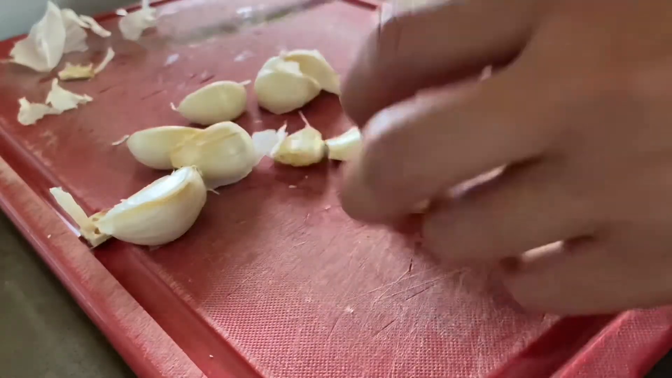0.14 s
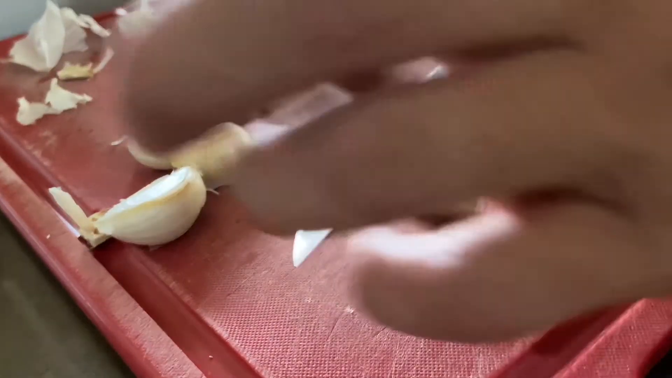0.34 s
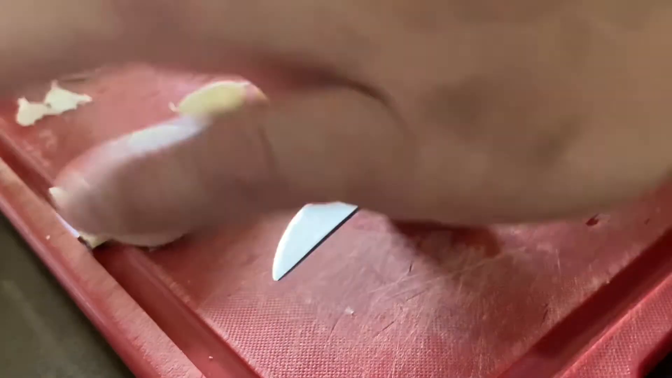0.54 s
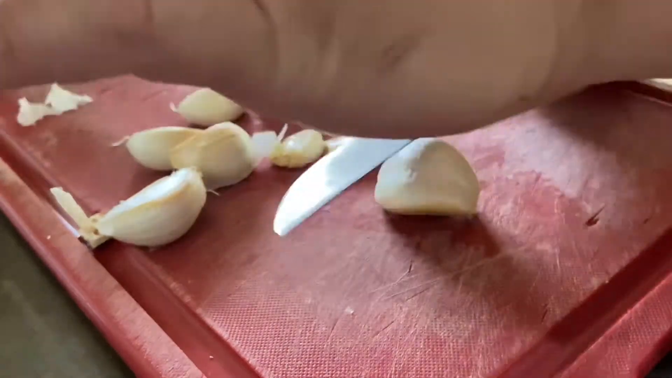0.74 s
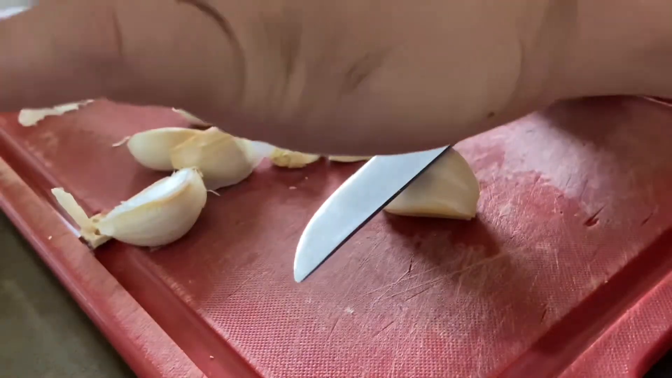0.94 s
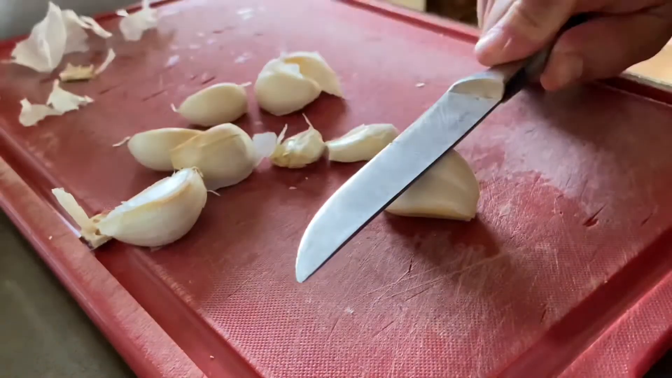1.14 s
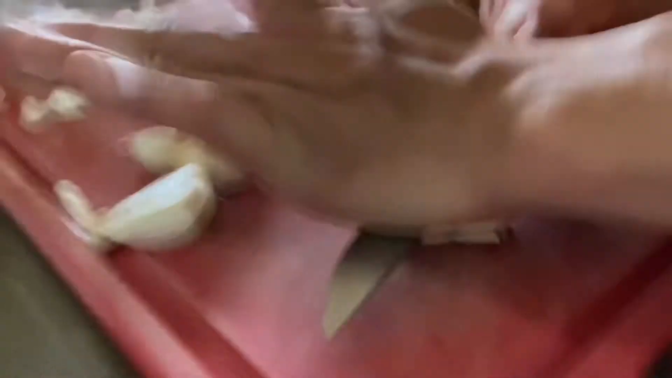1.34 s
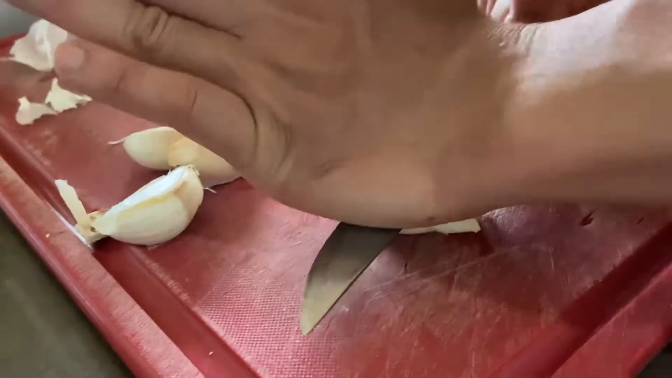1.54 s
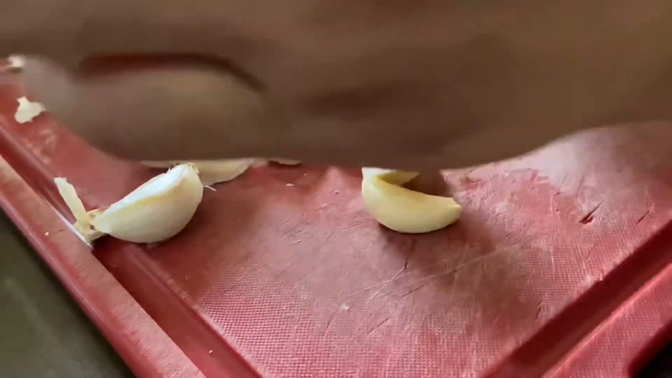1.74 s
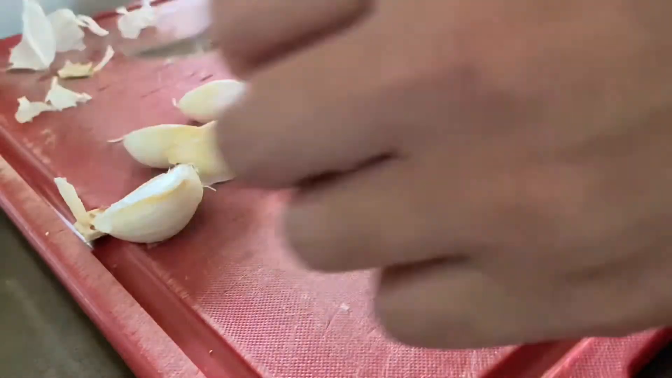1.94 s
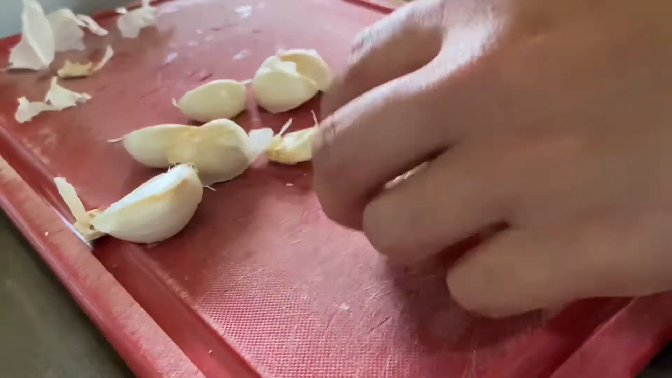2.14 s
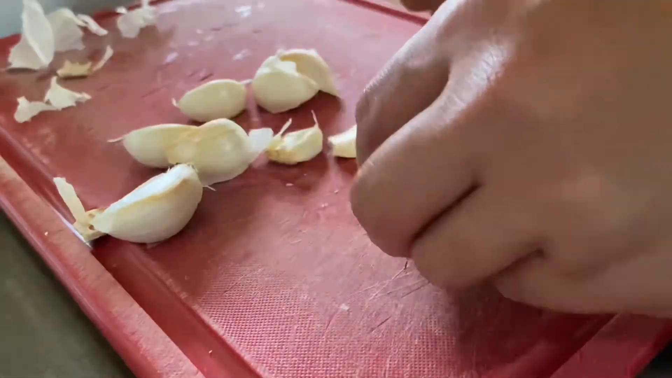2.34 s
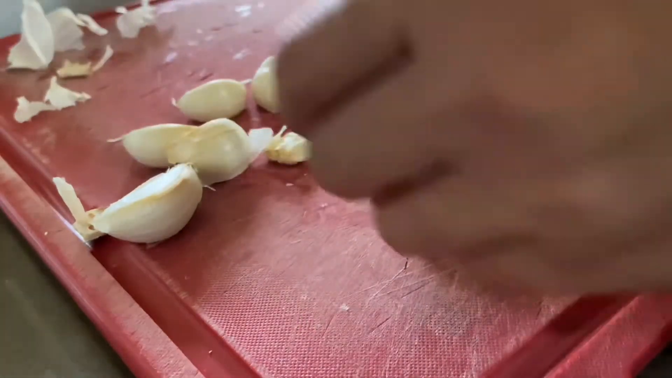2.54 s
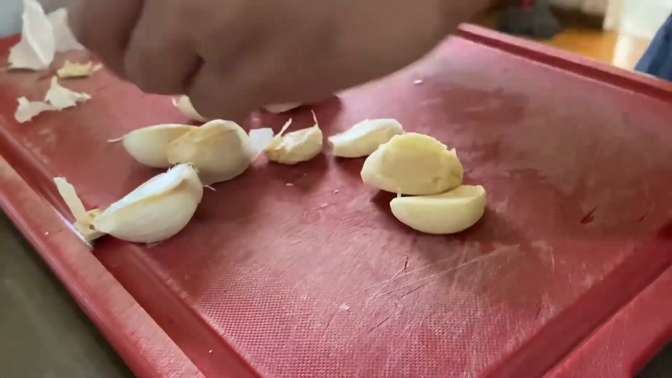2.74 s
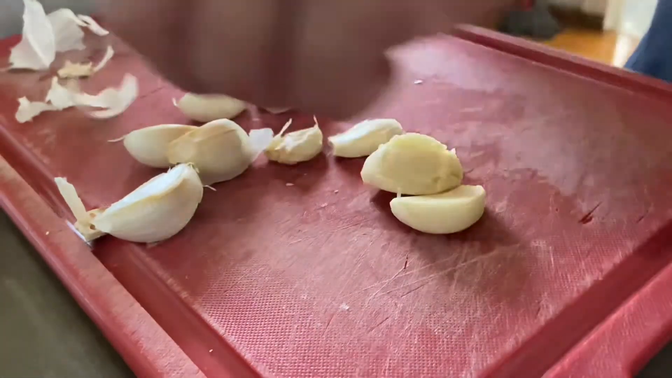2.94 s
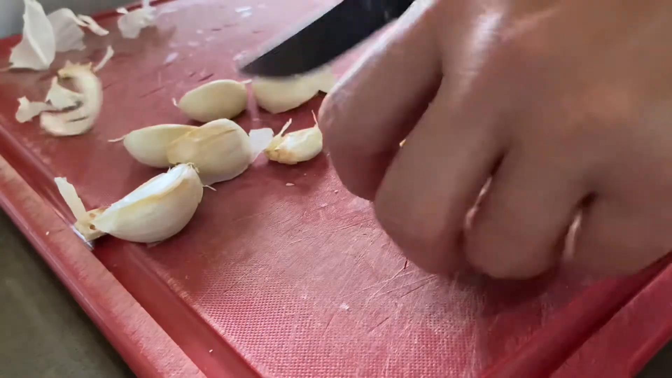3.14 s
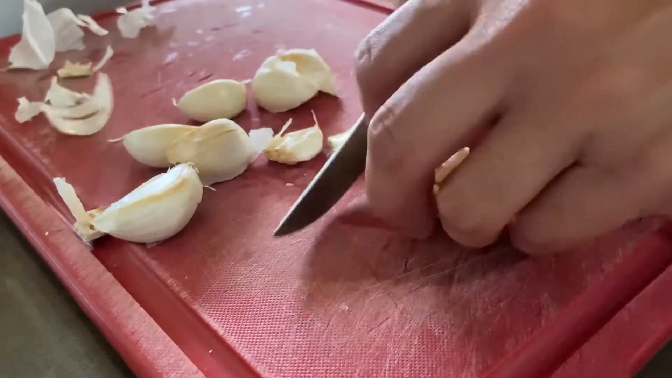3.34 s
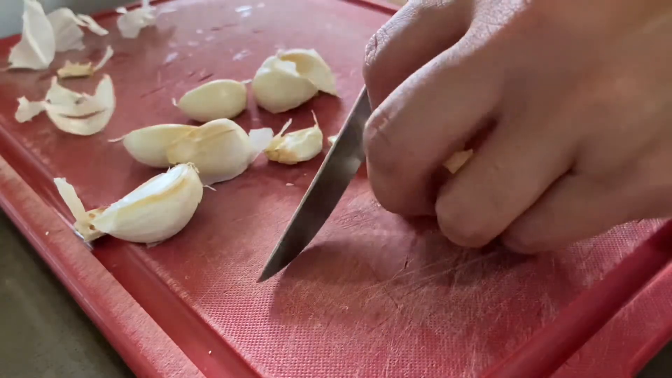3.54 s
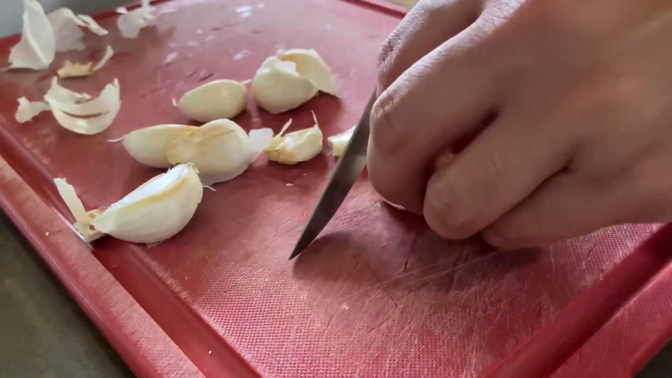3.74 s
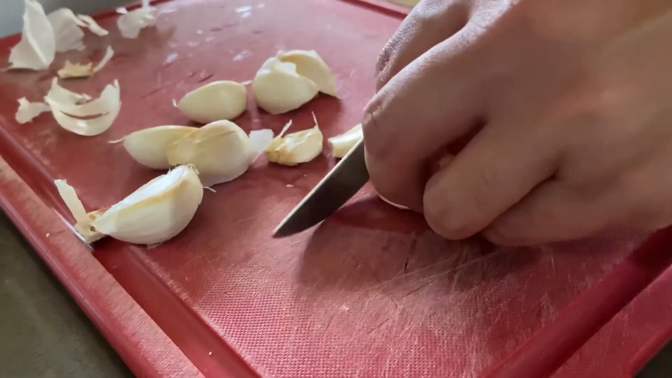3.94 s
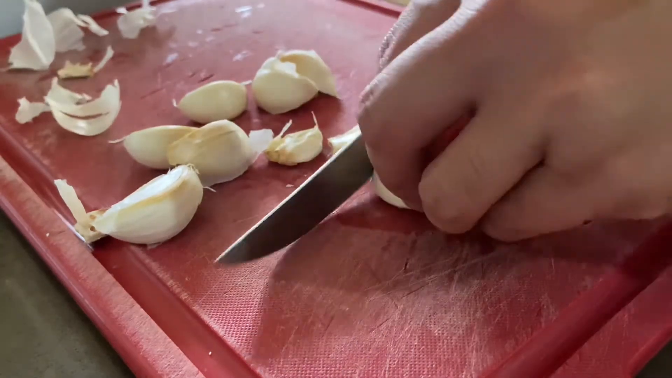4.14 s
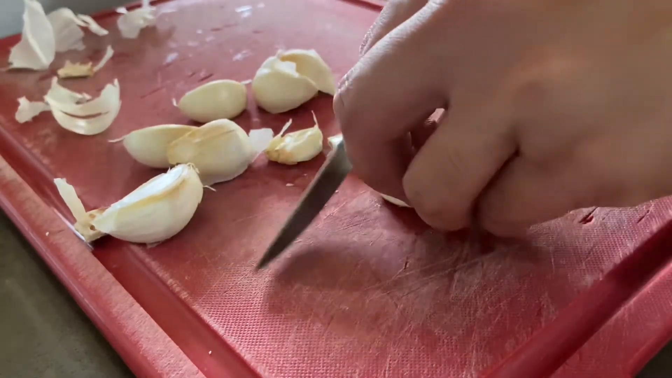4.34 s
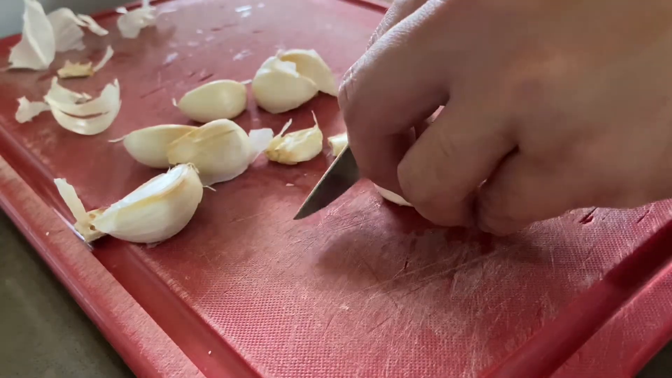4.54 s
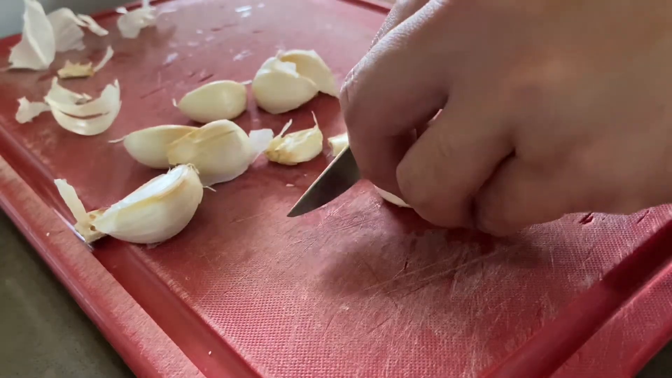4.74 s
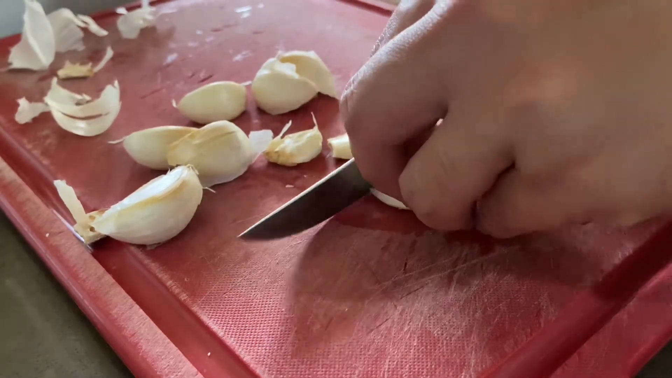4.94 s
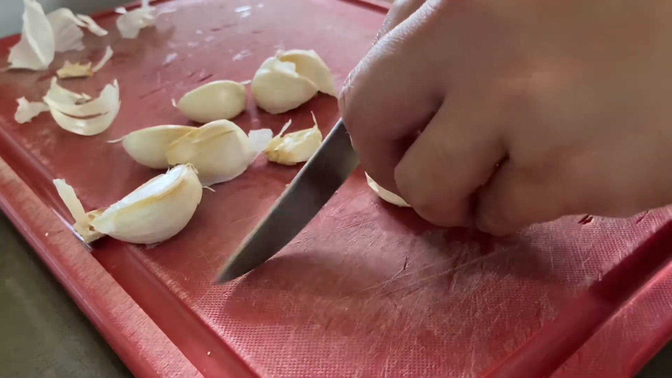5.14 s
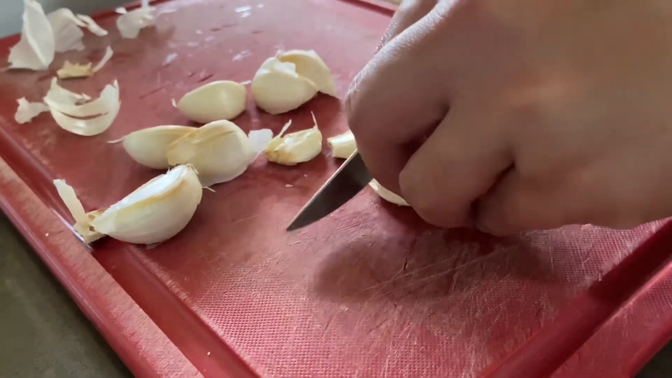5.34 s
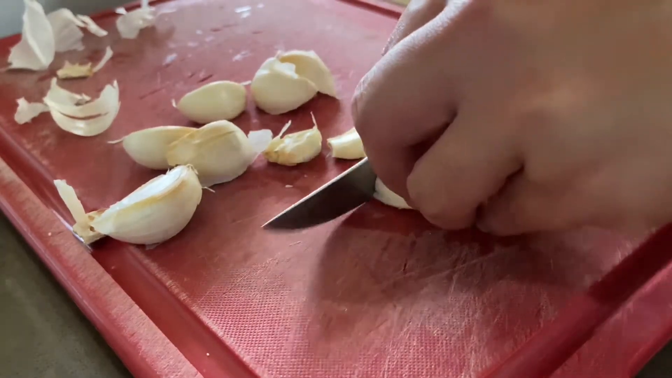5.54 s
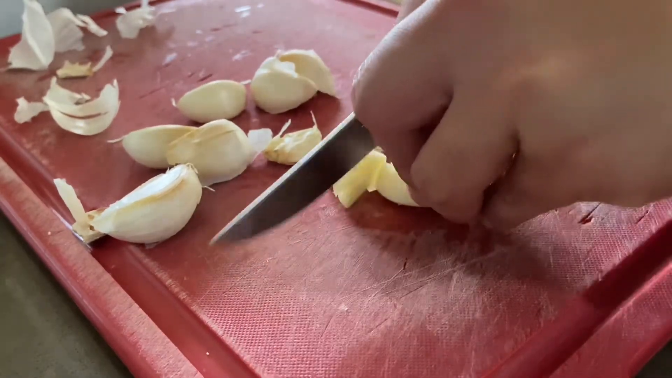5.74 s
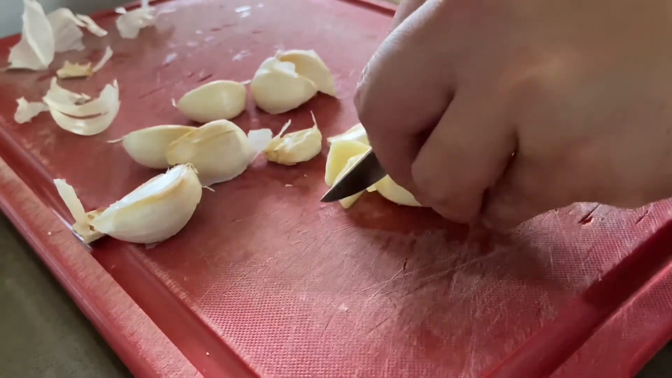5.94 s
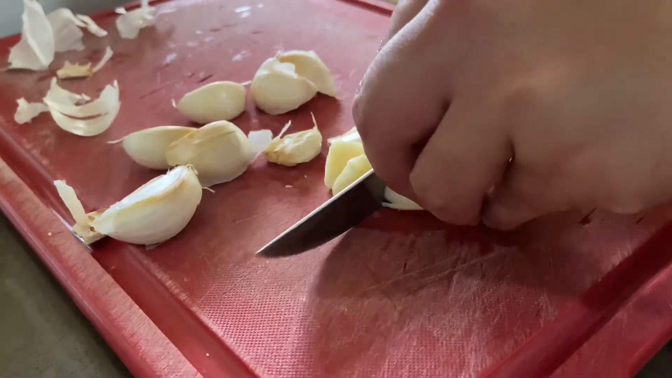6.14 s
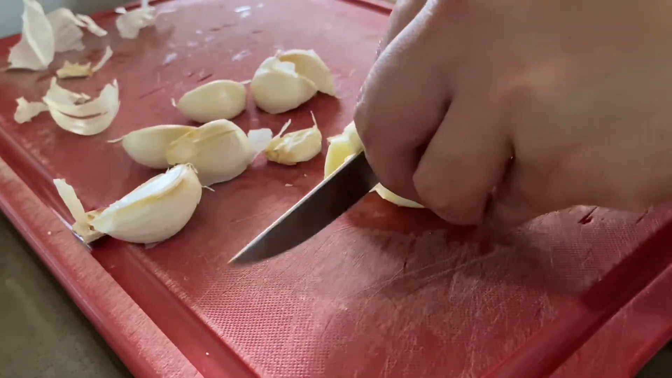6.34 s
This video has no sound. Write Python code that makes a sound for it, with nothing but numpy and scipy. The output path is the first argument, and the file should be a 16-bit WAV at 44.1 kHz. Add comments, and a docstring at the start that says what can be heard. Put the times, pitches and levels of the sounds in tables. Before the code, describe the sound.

A clove of garlic is tapped onto a plastic cutting board, then crushed by one violent smack, by far the biggest sound. Quiet picking and papery ticks fill the pause. A hard knock with a thin steel ring starts the chopping: uneven, separate cuts, crunchy snaps, short scraping drags and hollow board knocks. Close microphones, a lightly reverberant kitchen, and a low steady hum that slowly swells.

```python
"""A garlic clove is smacked flat and chopped on a plastic board in a kitchen, close to a pair of microphones.
From the start, shaped noise and wavering sines give room air and a faint hum; uneven noise gives the rustle.
Near 0.4 s come a light snap (noise tick), knock (board modes) and thud (counter modes). At 1.3 s the flat
blade slaps (noise bursts) and rings (steel modes), then slides squeak (resonant noise). Chops follow from
2.8 s to 6.3 s. Two-port delays place the close sounds, and decaying reflections make the room ring."""
import sys
import numpy as np
from scipy import signal
from scipy.fft import rfft, irfft, next_fast_len
from scipy.io import wavfile
from scipy.ndimage import uniform_filter1d

SR = 44100
rng = np.random.default_rng(int(sys.argv[2]) if len(sys.argv) > 2 else 0)


def output_pcm(signal):
    """Save a mono or channel-first signal as 16-bit PCM at the path in sys.argv[1].

    Samples are clipped to [-1, 1] before scaling.
    """
    pcm = np.clip(np.atleast_2d(signal).T, -1, 1) * 32767
    wavfile.write(sys.argv[1], SR, np.round(pcm).astype(np.int16))


N = 285327  # samples


def amp(db):
    """Level law: 20 dB is a factor of ten in amplitude."""
    return 10 ** (np.asarray(db) / 20)


def evened(x):
    """Normalisation to a root-mean-square of one."""
    return x / np.sqrt(np.mean(x ** 2) + 1e-20)


def read(points, hz):
    """Interpolation of a spectrum along logarithmic frequency."""
    f, value = np.transpose(points)
    return np.interp(np.log(hz + 1), np.log(f + 1), value)


def add(mix, s, sound):
    """Superposition: a sound is summed into the mix from time s."""
    part = mix[round(s * SR):][:len(sound)]
    part += sound[:len(part)]


def coloured(x, db):
    """Linear filtering: each FFT bin of x is scaled by its own dB value."""
    return irfft(rfft(x) * amp(db), len(x))


def ring(modes, lift_db, damping, rise_ms, spread):
    """Modal synthesis: a struck body sounds as dying sines, scattered because each blow lands elsewhere.

    The spread holds the scatter of level (dB), phase (radians) and pitch (share)."""
    hz, db, t60 = np.transpose(modes)[:, :, None]
    length_s = min(t60.max() / damping, 1 / 3)
    t = np.arange(int(SR * length_s)) / SR
    luck = rng.standard_normal((3, len(modes), 1)) * np.reshape(spread, (3, 1, 1))
    decay_db = 60 * damping * t / np.maximum(t60, .003)
    level = amp(db + lift_db + luck[0] - decay_db)
    sines = np.sin(2 * np.pi * hz * (1 + luck[2]) * t + luck[1])
    onset = 1 - np.exp(-t * 1000 / rise_ms)
    return (level * sines).sum(0) * onset


# slow swell of the whole background: t/s, level/dB
SWELL = [(0, -62), (.9, -63), (1.6, -59), (3.2, -56.5), (4.5, -52.5), (5.5, -48), (6.47, -50)]
# relative spectrum of the room air: f/Hz, level per Hz/dB
AIR = [(15, -43.5), (25, -7), (118, -1), (192, -5), (280, -16), (358, -14.5), (445, -18.5), (1060, -24.5),
       (2270, -39), (2900, -39), (5720, -40.5), (7510, -40), (8830, -57), (11000, -38), (16500, -68)]
# likeness of the air at left and right: f/Hz, coherence/1
AIR_SAME = [(60, 0.95), (130, 0.89), (260, 0.58), (1000, 0.3), (6000, 0.22), (9000, 0.23)]
# lines of an appliance, relative to the first line: f/Hz, level/dB
HUM = [(360.7, -75.5), (522.2, -85), (1066, -91.5), (1836, -101), (2923, -102)]
HUM_DB = -3  # first line against the air, before it wavers


def background():
    """Partly coherent noise: lumpy rumble and hiss, plus the wavering lines of an appliance."""
    s, swell_db = np.transpose(SWELL)
    t = np.arange(N) / SR
    frames, hz = N // 512 + 5, np.fft.rfftfreq(2048, 1 / SR)
    a, b, c, d, patches = rng.standard_normal((frames, 1025, 5)).T
    # smoothing over frequency, then time, makes the lumps
    patches = uniform_filter1d(patches, size=6, axis=0)
    patches = evened(uniform_filter1d(patches, size=8, axis=1))
    same = np.clip(read(AIR_SAME, hz), -1, 1)[:, None]
    left, other = a + 1j * b, c + 1j * d
    z = np.array([left, same * left + np.sqrt(1 - same ** 2) * other])
    z *= amp(read(AIR, hz)[:, None] + 0.5 * patches)
    air = evened(signal.istft(z, nperseg=2048, noverlap=1536)[1][:, :N])
    hum = np.zeros((2, N))
    for f, db in HUM:
        waver = uniform_filter1d(rng.standard_normal(N), size=3000)
        waver = evened(uniform_filter1d(waver, size=3000))
        phase = 2 * np.pi * f * t + 0.19 * waver + [[0], [1.8]]  # radians, left and right
        hum += amp(db - HUM[0][1] + 3.0 * waver) * np.sin(phase)
    return (air + hum * amp(HUM_DB)) * amp(np.interp(t, s, swell_db))


# relative spectrum of snapping skin and flesh: f/Hz, level/dB
SNAP = [(1500, -29), (2500, -8), (4000, -3), (5500, -10), (7000, -2.5), (9000, -5.5), (11000, 1),
        (13000, -0.5), (16000, -22)]


def skin_db(size, lower):
    """Complementary band division: the colour of a snap in its lower or upper treble, parted at 4800 Hz."""
    hz = np.fft.rfftfreq(size, 1 / SR)
    share = 1 / (1 + (hz / 4800) ** 8)
    return read(SNAP, hz) + 10 * np.log10((share if lower else 1 - share) + 1e-9)


# fingers rustle skin, the blade drags through flesh:
# start t/s, length t/s, skin hiss level/dB, drag on the board level/dB
RUSTLE = [(0.032, 0.047, -70.5, -81), (1.5, 0.18, -69, -71), (1.798, 0.03, -72, -80),
          (2.227, 0.038, -61, -72), (2.299, .12, -81, -81), (2.553, 0.081, -75.5, -90),
          (2.718, 0.044, -77.5, -84.5), (3.19, 0.21, -74, -81), (3.849, 0.089, -69.5, -57),
          (3.952, 0.078, -57, -56), (4.056, 0.094, -64.5, -67), (4.799, 0.027, -55, -50.5),
          (4.871, 0.1, -53.5, -67), (5.123, 0.084, -66.5, -72), (5.242, 0.019, -67, -62),
          (5.404, 0.034, -53.5, -50), (5.423, 0.0057, -41, -35.5), (5.478, 0.063, -66, -61),
          (5.574, 0.043, -52.5, -44.5), (6.021, 0.061, -46, -47), (6.113, 0.12, -55, -80)]
# relative spectrum of the drag: f/Hz, level/dB
DRAG = [(400, -19), (900, 0.5), (1600, 2), (2100, -9), (3500, -5), (5000, -4.5), (6800, -26), (9000, -42.5)]
RISE_DB_PER_S, HISS_FALL_DB_PER_S, DRAG_FALL_DB_PER_S = 702, 400.5, 200
CRACKS_PER_S, CRACK_DB, CRACK_SPREAD_DB = 35, 6.5, 5  # stray cracks that ride on the rustle


def rustle():
    """Friction as dense random slips: uneven noise and stray cracks in two bands that rise, hold and fade."""
    t, level, size = np.arange(N) / SR, np.zeros((2, N)), next_fast_len(N)
    fall_db_per_s = np.array([[HISS_FALL_DB_PER_S], [DRAG_FALL_DB_PER_S]])
    for s, length, upper_db, lower_db in RUSTLE:
        near = abs(t - s) < .5
        before = np.maximum(s - t[near], 0)
        after = np.maximum(t[near] - s - length, 0)
        stroke_db = [[upper_db], [lower_db]] - RISE_DB_PER_S * before - after * fall_db_per_s
        level[:, near] += amp(stroke_db)
    unevenness = evened(uniform_filter1d(rng.standard_normal(size), size=60))
    slips = rng.standard_normal(size) * amp(3.2 * unevenness)
    crack_size = amp(CRACK_SPREAD_DB * np.minimum(rng.exponential(1, size), 3))
    cracks = (rng.random(size) < CRACKS_PER_S / SR) * crack_size
    slips = evened(slips) * (1 + amp(CRACK_DB) * np.convolve(cracks, np.hanning(40), "same"))
    upper = evened(coloured(slips, skin_db(size, False)))
    lower = evened(coloured(slips, read(DRAG, np.fft.rfftfreq(size, 1 / SR))))
    return upper[:N] * level[0] + lower[:N] * level[1]


# skin and flesh snap: t/s, peak level of the upper treble/dB, lower treble against it/dB
SNAPS = [(0.377, -48.5, -12), (1.3216, -17.5, -15), (1.3241, -5, -14), (1.3274, -8.5, 0),
         (1.3834, -37, -8.5), (1.5514, -47.5, -13), (1.5793, -31, -34), (1.6172, -30, -23),
         (1.637, -41.5, -22), (1.657, -45, -22), (2.1856, -45.5, -33), (2.2233, -36.5, -21.5),
         (2.2972, -48, -9), (2.358, -51, -24), (2.5693, -49, -28), (2.7256, -55, -6), (2.8433, -41, 4),
         (3.3325, -37, 27.5), (3.8387, -49, -8), (3.8482, -38.5, 0.5), (3.898, -33.5, -9),
         (3.9426, -36, 3.5), (3.9509, -4, -29.5), (4.0039, -37.5, 7.5), (4.023, -30, -20),
         (4.0296, -14, -10.5), (4.1578, -25, -22.5), (4.164, -46, -24.5), (4.4028, -52.5, 18.5),
         (4.788, -20.5, -16.5), (4.797, -17, -23), (4.806, -22, -23), (4.8087, -8, -26.5),
         (4.8189, -7, -21.5), (4.851, -4.5, -38), (4.8644, -15, -30), (4.8754, -19, -31),
         (4.947, -35.5, -20), (4.9887, -18.5, -36), (4.9996, -33, -24), (5.255, -34.5, -9),
         (5.295, -38.5, -19.5), (5.3812, -42, -7), (5.3908, -35, -11), (5.4096, -25.5, -12.5),
         (5.4305, -6, -3), (5.4378, -20, -6), (5.4448, -11.5, -3.5), (5.5521, -20.5, -19),
         (5.635, -42.5, -12.5), (6.0006, -40.5, -14), (6.015, -38, -6), (6.0305, -29, 3),
         (6.077, -6.5, -36), (6.0797, -4, -17), (6.2697, -38, -27)]


def snaps():
    """Impulsive fracture noise: a tick that swells within a millisecond, then a weaker dying puff of cracks."""
    out, t = np.zeros(N), np.arange(2048) / SR
    tick = np.exp(-((t - .0009) / 0.00028) ** 2)
    tail = amp(-4.5 - 20 * t / 0.0026) * np.clip(t / 0.00054, 0, 1)
    lead = 128  # samples of room for the filter to spread before the tick
    for s, db, lower_db in SNAPS:
        puff = np.roll(rng.standard_normal(len(t)) * (tick + tail), lead)
        upper = coloured(puff, skin_db(len(t), False))
        lower = coloured(puff, skin_db(len(t), True))
        both = upper / abs(upper).max() + amp(lower_db) * lower / abs(lower).max()
        add(out, s - lead / SR, amp(db) * both)
    return out


# the blade or a clove meets the board:
# t/s, blow level/dB, hardness level/dB, damping factor/1, rebound level/dB
KNOCKS = [(0.379, -44, -28, 1.5, -13), (2.842, -56.5, 15.5, 3.3, -25.5), (3.331, -27.5, 10, 0.84, -7.5),
          (3.85, -35.5, -7.5, 1.07, -10), (3.906, -47, 4.5, 1.1, -17), (4.003, -52, 26, 1, -27),
          (4.405, -26.5, 3.5, 1.28, -27), (4.789, -43, 10.5, 1, -17), (4.821, -21, 8, 1.27, -18),
          (5.257, -31.5, -7, 1.4, -21.5), (5.392, -43, -5, 1.5, -13.5), (5.41, -42.5, 0, 1.7, -15.5),
          (5.43, -19, 11, 1.09, -18.5), (6, -44.5, -18, 2, -22), (6.033, -42.5, -11, .6, -11.5),
          (6.082, -20.5, 8, .95, -19)]
# modes of the plastic board: f/Hz, relative level/dB, t60/s before the damping factor divides it
BOARD = [(584, -9.5, 0.031), (639, -10.5, 0.037), (838, -10, 0.042), (835, -8, 0.11), (881, -0.5, 0.09),
         (1007, -10.5, 0.078), (1170, -2.5, 0.043), (1335, 5.5, 0.035), (1482, -2, 0.043),
         (1609, 6.5, 0.022), (1853, -22.5, 0.06), (2440, -4, 0.011), (2780, 2, 0.009), (3131, -2, 0.021),
         (3420, -12.5, 0.022), (3680, 0, 0.016), (4180, -5.5, 0.004), (4750, -27, 0.011), (6240, -12, .01),
         (6900, -23, 0.0058)]
MIDDLE_HZ, UPPER_HZ = 950, 2200  # lower bounds of the middle and upper modes
MIDDLE_SHARE, MIDDLE_DB = 0.51, -2  # hardness lifts the upper modes fully, the middle ones in part
BOUNCE_S, BOUNCE_SOFTER_DB = 0.034, -7  # every knock rebounds once


def knocks():
    """Modal excitation by impact: a harder blow feeds the board's higher modes, and a softer rebound follows."""
    out, hz = np.zeros(N), np.transpose(BOARD)[0][:, None]
    for s, db, hard_db, damping, rebound_db in KNOCKS:
        for late, less_db, softer_db in ((0, 0, 0), (BOUNCE_S, rebound_db, BOUNCE_SOFTER_DB)):
            upper_db = hard_db + softer_db
            middle_db = (hz > MIDDLE_HZ) * (MIDDLE_SHARE * upper_db + MIDDLE_DB)
            lift_db = np.where(hz > UPPER_HZ, upper_db, middle_db)
            blow = ring(BOARD, lift_db, damping, .7, [1.5, 1.5, .006])
            add(out, s + late + .0006, amp(db + less_db) * blow)
    return out


# hand and blade push the counter: t/s, push level/dB, lift of the modes above the lowest/dB
THUDS = [(0.386, -47, 5.5), (1.332, -14.5, -1), (1.344, -27.5, -21.5), (3.331, -53.5, 14.5),
         (3.86, -50, 13), (4.012, -32.5, -0.5), (4.4, -46.5, 9), (4.799, -43.5, 6), (4.907, -34.5, -24),
         (5.429, -50, 18.5), (5.497, -29.5, 2), (5.789, -60, 13), (5.868, -47.5, 2.5), (6.029, -43, 4.5),
         (6.076, -46, 9), (6.146, -33, -8)]
# modes of the counter: f/Hz, relative level/dB, t60/s before the damping factor divides it
COUNTER = [(54, 0, .17), (115, 0, .075), (172, 0, .055), (290, -12, .05)]
THUD_DAMPING = 0.58


def thuds():
    """Low-frequency modal response: slow pushes ring the counter, alike at both microphones."""
    out = np.zeros(N)
    above_lowest = (np.arange(len(COUNTER)) > 0)[:, None]
    for s, db, upper_db in THUDS:
        push = ring(COUNTER, upper_db * above_lowest, THUD_DAMPING, 2.1, [.5, .1, .01])
        add(out, s, -amp(db) * push)
    return out


# the palm drives the flat blade down on the clove: t/s, burst level/dB, t60/s
SLAPS = [(1.323, -18, 0.022), (1.3282, -10, 0.0092), (1.333, -28, 0.054)]
# relative spectrum of the slap: f/Hz, level/dB
SLAP = [(200, 6.5), (500, -8.5), (1000, 0), (1500, 3.5), (2200, -6), (3800, -6.5), (6000, -2), (10000, -24),
        (16000, -25.5)]


def slaps():
    """Heavily damped impact: broad bursts of noise, since flesh on steel damps every ring."""
    out, t = np.zeros(N), np.arange(4096) / SR
    colour_db = read(SLAP, np.fft.rfftfreq(len(t), 1 / SR))
    for s, db, t60 in SLAPS:
        noise = evened(coloured(rng.standard_normal(len(t)), colour_db))
        onset = np.clip(t / 0.00046, 0, 1)
        add(out, s, amp(db - 60 * t / t60) * onset * noise)
    return out


# the bare blade is left ringing: t/s, level/dB
RINGS = [(1.329, -63), (3.33, -45.5), (4.403, -66)]
# modes of the steel blade: f/Hz, relative level/dB, t60/s
BLADE = [(5080, -9.5, .15), (6270, -4.5, 0.18), (8400, -1.5, .1), (7440, -3.5, 0.055), (10500, -17.5, 0.11),
         (11340, -5.5, 0.073), (11900, -0.5, .2), (14560, -5.5, .12)]


def blade_rings():
    """Lightly damped modal vibration: the thin high ring of the steel."""
    out = np.zeros(N)
    for s, db in RINGS:
        add(out, s, amp(db) * ring(BLADE, 0, 1, .5, [2, 1, 0]))
    return out


# something slides and squeaks: start t/s, length t/s, centre f/Hz, width f/Hz, level/dB
SQUEAKS = [(1.528, .07, 3255, 81.5, -67.5), (2.069, 0.019, 7030, 150, -74.5), (5.105, 0.14, 2580, 500, -59),
           (5.11, 0.13, 4000, 899, -69.5)]


def squeaks():
    """Resonance driven by noise: a single spectral peak sounds for as long as the slide lasts."""
    out = np.zeros(N)
    f = np.fft.rfftfreq(8192, 1 / SR)
    for s, length, hz, width, db in SQUEAKS:
        noise = rng.standard_normal(8192)
        peak_db = -20 * np.log10(1 + (2 * (f - hz) / width) ** 2)
        samples = int(length * SR)
        tone = evened(coloured(noise, peak_db))[:samples]
        add(out, s, amp(db) * tone * signal.windows.tukey(samples, .6))
    return out


# how the two ports hear a close source: f/Hz, left phase lead/rad, left over right level/dB
PORTS = [(0, -2.5, 0), (150, 2.8, 7.5), (300, 2, 1), (780, -1.5, 10.5), (1200, 1.5, 3.5), (1722, 2, 8),
         (2805, 1.5, 8.5), (3600, 2, 10.5), (5030, 1.5, 6), (6030, 1.86, 2.5), (7686, -1, 1.5),
         (17160, -16.5, -3.5), (22050, -36, -8)]


def ports(x):
    """Interchannel phase and level difference: half goes to each channel, with opposite sign."""
    hz, turn, db = np.transpose(PORTS)
    size = next_fast_len(N)
    f = np.fft.rfftfreq(size, 1 / SR)
    half = np.exp(.5j * np.interp(f, hz, turn)) * amp(np.interp(f, hz, db) / 2)
    return irfft(rfft(x, size) * np.array([half, 1 / half]), size)[:, :N]


# reverberation time of the late reflections: f/Hz, t60/s
ROOM = [(250, 0.96), (900, 0.6), (1700, 0.63), (2700, 0.59), (3900, 0.66), (5500, 0.46), (8000, 0.22),
        (12000, 0.17)]
# relative spectrum of the late reflections: f/Hz, level/dB
ROOM_COLOUR = [(60, -7), (250, 2), (900, -1), (1600, -5), (2100, -6), (3800, -8.5), (6000, -6),
               (12000, -11.5), (16000, -23.5)]
ROOM_TURNS_PER_S = 45  # the sound alternates between two sets of reflections, which blurs their comb


def room(x):
    """Statistical reverberation: sparse random-sign reflections die band by band, the earliest fastest."""
    taps = np.zeros((4, SR))
    # one reflection in every 20 samples, at a random place
    at = np.arange(60, SR - 20, 20) + rng.integers(0, 20, (4, (SR - 61) // 20))
    np.put_along_axis(taps, at, rng.choice([-1., 1.], at.shape), 1)
    hz, t, z = signal.stft(taps, SR, nperseg=256)
    early = amp(13.0 - 60 * t / 0.024)
    late_db = read(ROOM_COLOUR, hz)[:, None] - 60 * t / read(ROOM, hz)[:, None]
    late = amp(late_db) * np.clip(t / 0.0026, 0, 1)
    tail = signal.istft(z * (early + late), SR, nperseg=256)[1]
    tail = tail / np.linalg.norm(tail, axis=1).mean()
    turn = 2 * np.pi * ROOM_TURNS_PER_S * np.arange(N) / SR
    fed = x * np.array([np.cos(turn), np.cos(turn), np.sin(turn), np.sin(turn)])
    wet = signal.fftconvolve(fed, tail, axes=1)[:, :N]
    return wet[:2] + wet[2:]


def scene():
    """Superposition of direct sound, counter thuds, reverberation and background."""
    close = rustle() + snaps() + knocks() + slaps() + blade_rings() + squeaks()
    return background() + ports(close) + thuds() + amp(-5.5) * room(close)


EDGE_HZ = 16800  # upper band limit


def record(dry):
    """Transducer response: the deepest bass is lost, the tallest peaks saturate, then the band is limited."""
    thin = signal.sosfilt(signal.butter(4, 42, "high", fs=SR, output="sos"), dry)
    rounded = .8 * np.tanh(thin / .8)
    low_pass = signal.firwin(511, EDGE_HZ, window=("kaiser", 9), fs=SR)
    return signal.oaconvolve(rounded, low_pass[None], "same")


dry = scene()
out = record(dry)
output_pcm(out)
```